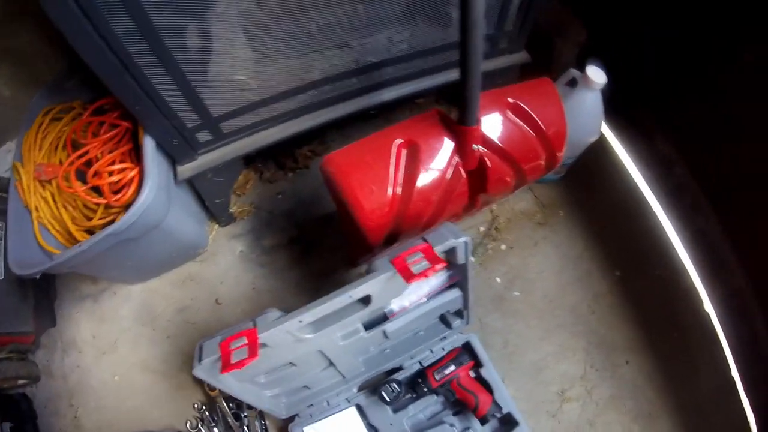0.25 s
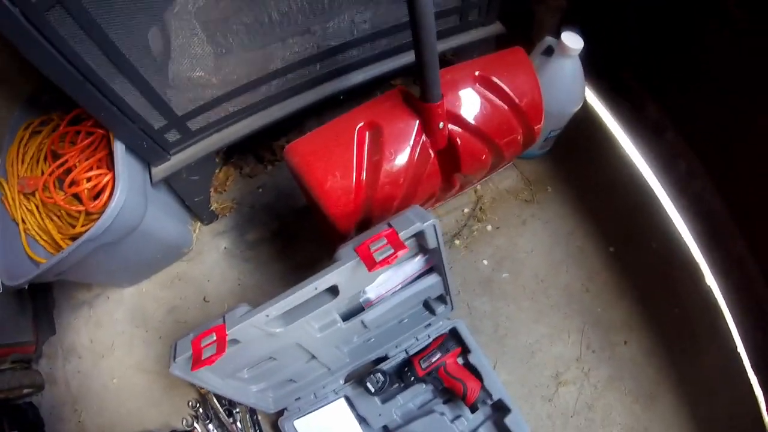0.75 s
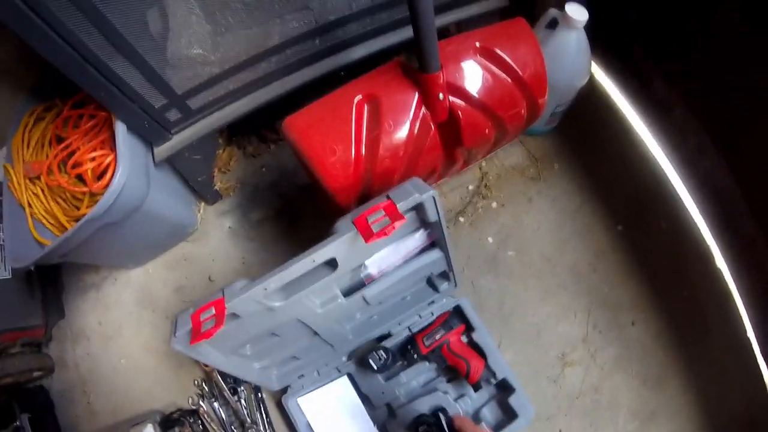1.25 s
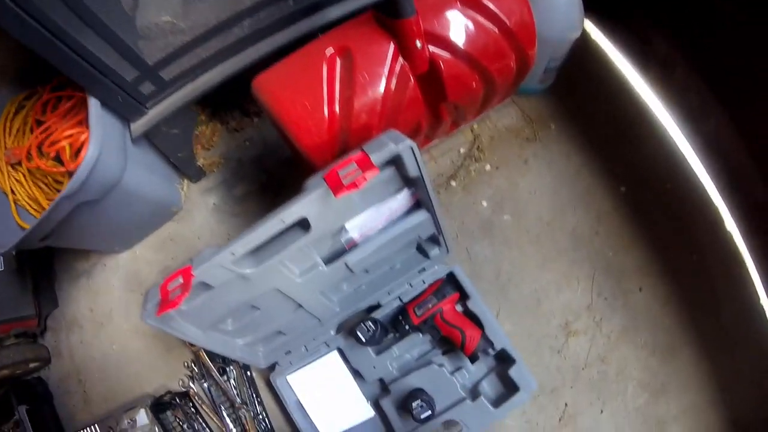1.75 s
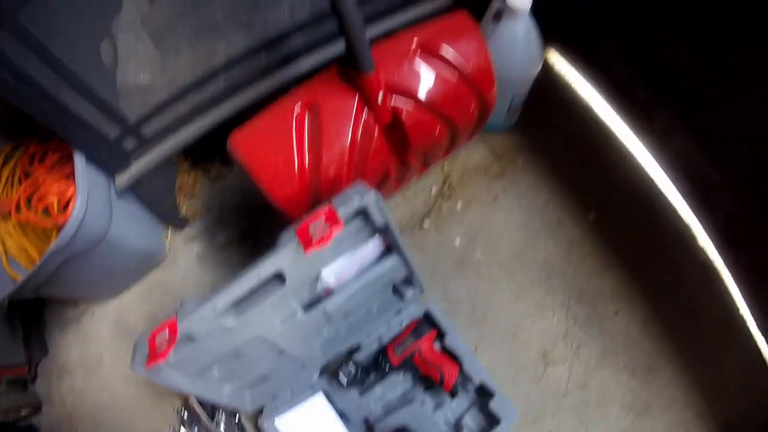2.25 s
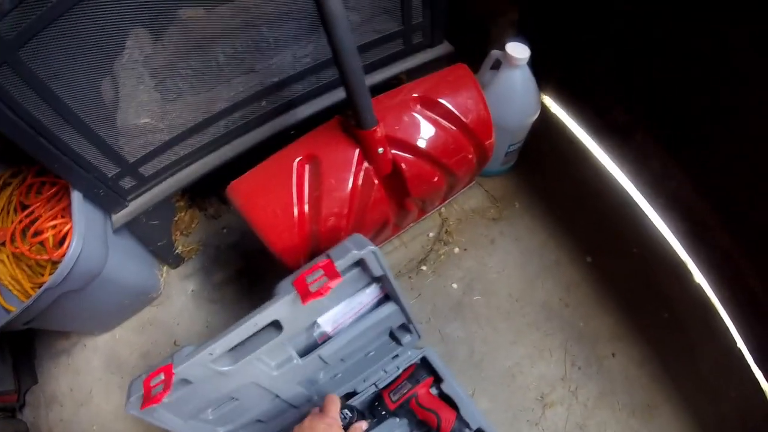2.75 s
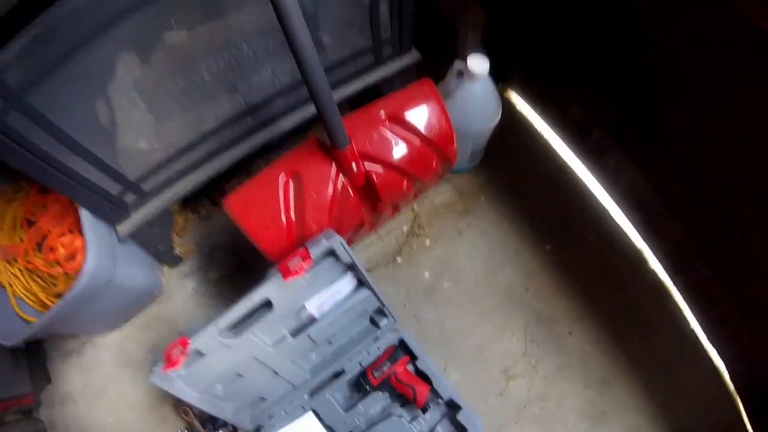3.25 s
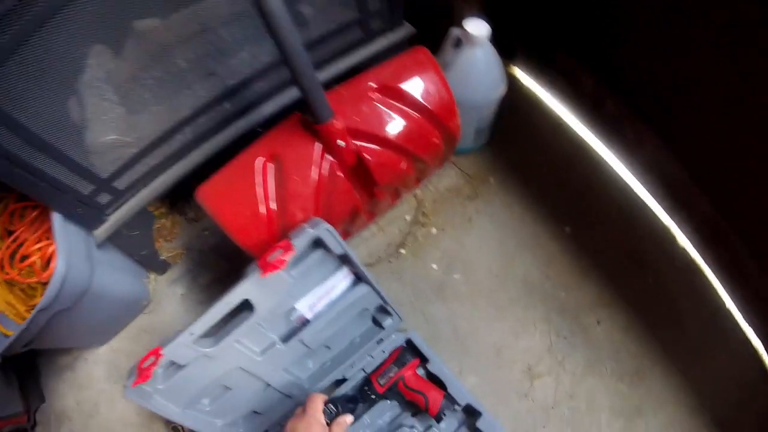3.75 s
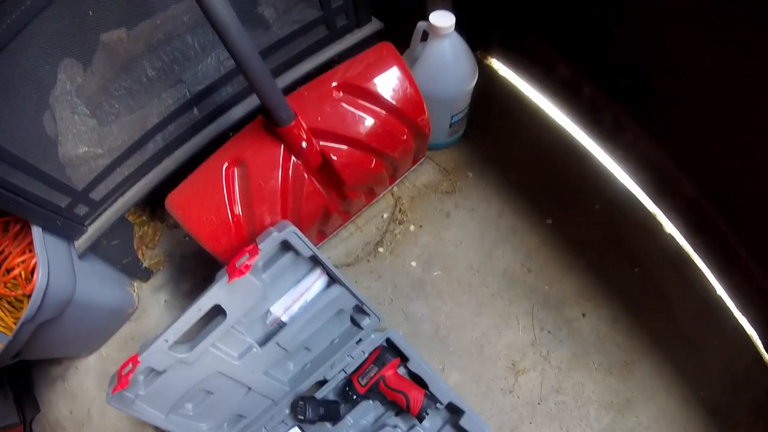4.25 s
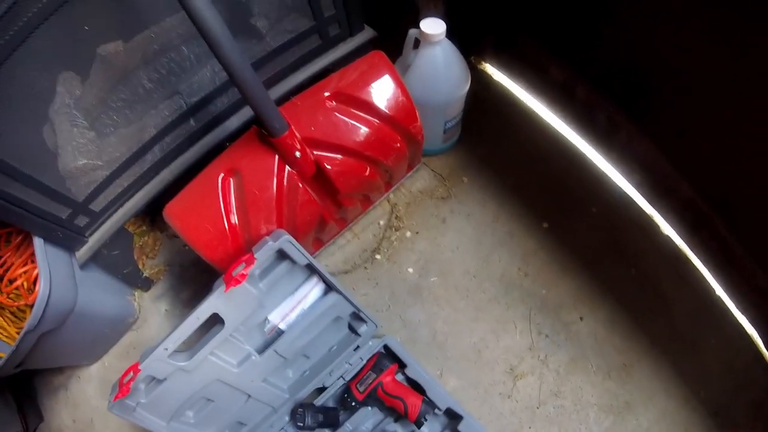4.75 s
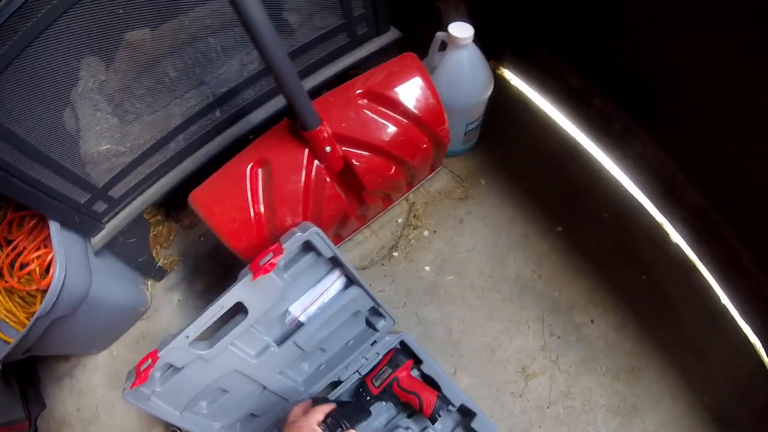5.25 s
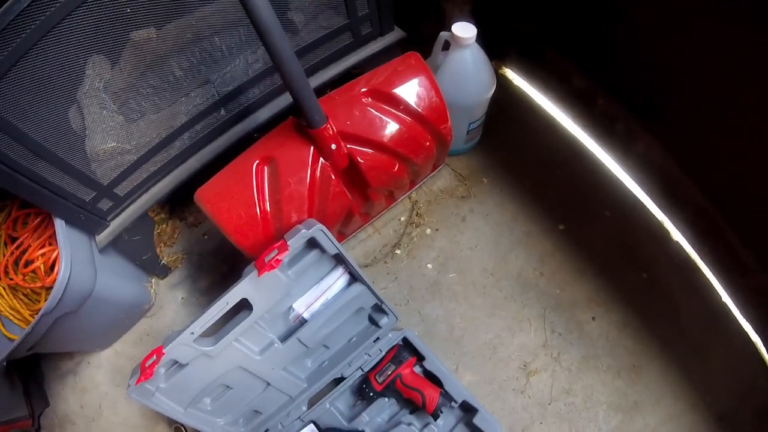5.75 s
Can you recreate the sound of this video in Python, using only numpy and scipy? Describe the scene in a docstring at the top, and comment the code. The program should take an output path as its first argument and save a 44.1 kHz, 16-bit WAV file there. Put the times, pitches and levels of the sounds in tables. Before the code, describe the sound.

Faint steel clinks and a light scrape, then hollow plastic knocks, clacks and rattles as sockets and a power tool are handled in a tool case.

```python
"""A faint ring is already dying away as the sound begins, with a scrape and a light knock, then hollow thuds,
clacks and chatter. Garage floor: steel sockets and a power tool are sorted in a hollow plastic tool case.
Knocks and clinks are damped modes and noise bursts; chatter is random small contacts; slides are slipping
noise. The direct sound outweighs the garage's brief answer; low rumble and hiss lie beneath. A small microphone
with a resonant port feeds the left channel only; the right is silent."""
import sys
import numpy as np
from scipy import signal
from scipy.fft import rfft, irfft, next_fast_len
from scipy.io import wavfile
from scipy.ndimage import map_coordinates

SR = 44100
rng = np.random.default_rng(int(sys.argv[2]) if len(sys.argv) > 2 else 0)


def wav_out(sig):
    """Save sig, one row per channel (or a flat mono array), as 16-bit PCM at SR to the path in sys.argv[1]."""
    wavfile.write(sys.argv[1], SR, np.round(np.clip(np.atleast_2d(sig).T, -1, 1) * 32767).astype(np.int16))


N = 265349  # length [samples]


def amp(db):
    """Decibels to gain."""
    return 10 ** (np.asarray(db) / 20)


def unit(x):
    """x scaled to rms 1."""
    return x / np.sqrt(np.mean(x ** 2) + 1e-20)


def blow(x, db):
    """x scaled so that the rms of its first 20 ms has the given level."""
    return amp(db) * x / np.sqrt(np.mean(x[:SR // 50] ** 2) + 1e-20)


def add(track, s, sound):
    """Mix a sound into the track at time s."""
    part = track[max(0, round(s * SR)):][:len(sound)]
    part += sound[:len(part)]


def along(points, hz):
    """(frequency, value) points read on a log frequency axis."""
    f, v = np.transpose(points)
    return np.interp(np.log(hz + 1), np.log(f + 1), v)


def coloured(x, points):
    """x through a causal, minimum-phase filter with the given spectrum."""
    m = 2 * next_fast_len(len(x))
    log_gain = np.log(amp(along(points, np.fft.rfftfreq(m, 1 / SR))))
    # folding the cepstrum forward in time makes the filter causal
    cepstrum = irfft(log_gain)
    cepstrum[1:m // 2] *= 2
    cepstrum[m // 2 + 1:] = 0
    response = np.exp(rfft(cepstrum))
    return irfft(rfft(x, m) * response, m)[:len(x)]


def ring(modes, t, scatter_db, detune):
    """Damped modes; the place of contact sets the strength and sign of each, and pitches scatter a little."""
    out = np.zeros(len(t))
    draws = rng.standard_normal((len(modes), 3))
    for (hz, db, t60), (size, shift, side) in zip(modes, draws):
        envelope = amp(db + scatter_db * size - 60 * t / t60)
        tone = np.sin(2 * np.pi * hz * (1 + detune * shift) * t)
        out += np.sign(side) * envelope * tone
    return out


def burst(t, t60, colour, rise=0.00023):
    """Countless close, heavily damped modes of a plastic wall that gives a little under the blow."""
    envelope = amp(-60 * t / t60) * (1 - np.exp(-t / rise))
    return coloured(rng.standard_normal(len(t)) * envelope, colour)


FOCUS_DB, FOCUS_OCTAVES = 6.5, 0.16  # greatest lift of a favoured mode, and its reach in pitch


def favoured(modes, place_hz):
    """The modes with a belly at the struck place ring louder."""
    lifted = []
    for hz, db, t60 in modes:
        octaves = np.log2(hz / place_hz)
        lift_db = FOCUS_DB * np.exp(-(octaves / FOCUS_OCTAVES) ** 2)
        lifted.append((hz, db + lift_db, t60))
    return lifted


# A tool meets the case: (time [s], relative strength [dB], hardness: relative click [dB],
# weight: relative shell thump [dB], pitch the struck place favours [Hz])
KNOCKS = [(0.006, -52, -1, -1, 806), (1.028, -61, 14.5, -7, 1030), (1.093, -77.5, 19.5, -10, 1000),
          (2.0542, -20, -6.5, -17, 325), (2.1113, -26.5, -8.5, -14, 321), (2.347, -34, -6, -27, 240),
          (2.3524, -28, -8, -21, 240), (2.404, -33, -15, -28, 315), (2.417, -36, -6.5, -24, 620),
          (2.5675, -38.5, -11.5, -30, 880), (2.7, -44, -21, -29, 370), (2.832, -50.5, -11.5, -12, 760),
          (2.9317, -44.5, -9, -20, 368), (3.013, -49, -16.5, 0, 860), (3.213, -39, -22.5, -7, 636),
          (3.256, -35, -22, 4.5, 181), (3.317, -40.5, -27.5, 1, 180), (3.741, -20.5, -13, 3, 310),
          (3.76, -24, -14.5, -16, 600), (3.8166, -45.5, 8, -16, 350), (3.948, -34, -9, -9.5, 330),
          (3.973, -31.5, -21, -1.5, 232), (4.006, -36, -11.5, -7, 317), (4.036, -39, -16, 4, 315),
          (4.215, -46.5, -24, 1, 470), (4.494, -55.5, -36, 6.5, 358), (4.582, -46.5, -15, -0.5, 350),
          (4.599, -34.5, -18.5, -7, 318), (4.699, -35, -19.5, -15, 365), (5.215, -43.5, -24, -0.5, 265),
          (5.243, -42.5, -5, 1, 180), (5.377, -33.5, -24.5, -1, 317), (5.398, -31.5, -29.5, -6, 633),
          (5.4997, -32.5, -8.5, 5, 143), (5.6775, -48.5, 6.5, 1, 180), (5.712, -30.5, -22, -5.5, 340),
          (5.926, -50.5, 4.5, 12, 343), (5.9435, -19.5, -17, -2, 250), (5.999, -26.5, -35, -19, 325)]
# Whole shell against the floor, the case's panels, its stiff ribs and walls:
# (frequency [Hz], relative level [dB], t60 [s])
SHELL = [(106.5, -8.5, 0.15), (117, -10.5, 0.29), (145.7, -5.5, 0.11), (183.3, -1.5, 0.12)]
PANELS = [(244.7, 1.5, 0.11), (277, -5, 0.13), (317.9, -0.5, 0.15), (367.7, 5, 0.11), (467.4, 2.5, 0.071),
          (633.5, 0.5, 0.1), (681, 0.5, 0.053), (770.5, -6, 0.11), (871, -4, 0.081), (994.5, -8, 0.094)]
RIBS = [(1246.4, 2, 0.055), (1373, -5.5, 0.078), (1642, -4, 0.085), (1760, -2, 0.056), (1978, -4, 0.052),
        (2294, -4, 0.041), (2510, -8, 0.058), (2774, -4.5, 0.054)]
# How well the shell and the small case radiate: (frequency [Hz], gain [dB])
SHELL_RADIATION = [(20, -47), (55, -7), (95, -8.5), (220, -0.5), (600, -21), (4000, -52)]
RADIATION = [(20, -56), (70, -28), (150, -9.5), (220, 2), (900, -3), (2000, -5), (8000, -33)]
# Colour of the hollow clack and of the hard click: (frequency [Hz], relative density [dB per Hz])
CLACK = [(100, -66.5), (350, 2.5), (700, 6.5), (1100, 2), (1450, -1), (1800, -5.5), (2350, -9.5),
         (2800, -17.5), (3500, -14), (7000, -46), (14000, -70)]
CLICK = [(300, -57), (1500, -18.5), (2800, 9), (3800, 2), (4700, 2.5), (6000, -3), (6900, -11.5),
         (7600, -10), (9000, -16), (11000, -31), (14000, -72)]
CLACK_DB, CLACK_PER_HARDNESS = -2.5, 0.43  # clack at zero hardness, and its growth [dB per dB]


def knocks(brightening=0.42, plain_hardness_db=-9, ribs_db=-8):
    """A tool meets the case: shell thump, panel ring, hollow clack with ringing ribs, and hard click."""
    out, t = np.zeros(N), np.arange(SR // 2) / SR
    for s, strength_db, hardness_db, weight_db, place_hz in KNOCKS:
        clack_db = CLACK_DB + CLACK_PER_HARDNESS * hardness_db
        shell_ring = ring(favoured(SHELL, place_hz), t, scatter_db=6.0, detune=0.018)
        shell = coloured(shell_ring, SHELL_RADIATION)
        panel_ring = ring(favoured(PANELS, place_hz), t, scatter_db=2.5, detune=0.0076)
        panels = coloured(panel_ring, RADIATION)
        # a hard, clicking contact also drives the wall's higher modes (dB per octave)
        tilt_db = brightening * (hardness_db - clack_db - plain_hardness_db)
        wall_colour = [(hz, db + tilt_db * np.log2(hz)) for hz, db in CLACK]
        rib_modes = [(hz, db + tilt_db * np.log2(hz), t60) for hz, db, t60 in RIBS]
        wall = burst(t, 0.087, wall_colour)
        ribs = ring(rib_modes, t, scatter_db=3.0, detune=0.0071)
        hollow = blow(wall, 0) + blow(ribs, ribs_db)
        # each part with its own share of the garage
        thump = blow(in_garage(shell, wet_db=-6.5), weight_db - 7.0)
        panel = blow(in_garage(panels, wet_db=-7.5), -0.46)
        clack = blow(in_garage(hollow, wet_db=-7), clack_db + 1.96)
        click = blow(in_garage(burst(t, 0.036, CLICK), wet_db=-13), hardness_db - 4.0)
        add(out, s, amp(strength_db) * (thump + panel + clack + click))
    return out


# A part is dragged over the plastic: (start [s], length before dying away [s], relative rubbing [dB],
# hardness of the edge [0-1], relative bumping [dB])
DRAGS = [(0, 0.01, -49.5, 1, -61), (2.856, 0.16, -70, 0.2, -49), (2.889, 0.034, -61, .5, -42.5),
         (5.188, 0.12, -59, 0.14, -44), (5.38, 0.068, -51, 0, -45), (5.501, 0.058, -46, 0.07, -50.5),
         (5.585, 0.042, -58.5, 0.1, -64), (5.836, 0.11, -49.5, 1, -52)]
DRAG_ATTACK_S, DRAG_T60_S = 0.026, 0.17  # a drag gathers speed, and comes to rest


def stroke(start, length):
    """The speed of one drag: it rises, and dies away once its length is over."""
    t = np.arange(N) / SR - start
    gathering = np.clip(t / DRAG_ATTACK_S, 0, 1)
    return gathering * amp(-60 * np.maximum(t - length, 0) / DRAG_T60_S)


SETTLE_DB, SETTLE_DELAY_S, SETTLE_T60_S = -16.5, 0.015, 0.24  # rocking: relative level, wait, decay
BUMPS_PER_S, BUMP_SCATTER_DB = 110, 3  # mean rate over all places, and spread of strength
BUMP_SHELL_DB, BUMP_CLACK_DB, BUMP_CLICK_DB = -8.5, -12.5, -22  # each over the panels


def chatter(count=4):
    """Dragged parts bump over ribs and dropped ones rock to rest: random contacts at a few places."""
    t = np.arange(SR // 3) / SR
    motion = sum(amp(bump_db) * stroke(start, length) for start, length, _, _, bump_db in DRAGS)
    for s, strength_db, *_ in KNOCKS:
        rocking = amp(strength_db + SETTLE_DB - 60 * t / SETTLE_T60_S)
        add(motion, s + SETTLE_DELAY_S, rocking)
    out = np.zeros(N)
    for _ in range(count):
        hits = rng.random(N) < BUMPS_PER_S / count / SR
        bumps = unit(hits * amp(BUMP_SCATTER_DB * rng.standard_normal(N)))
        panels = coloured(ring(PANELS, t, scatter_db=1.0, detune=0.0073), RADIATION)
        shell = coloured(ring(SHELL, t, scatter_db=6.0, detune=0.0085), SHELL_RADIATION)
        place = blow(panels, 0) + blow(shell, BUMP_SHELL_DB)
        place += blow(burst(t, 0.11, CLACK), BUMP_CLACK_DB)
        place += blow(burst(t, 0.02, CLICK), BUMP_CLICK_DB)
        out += signal.fftconvolve(bumps * motion, place / np.linalg.norm(place))[:N]
    return in_garage(out / np.sqrt(count), wet_db=-10.5)


def wobble(rate):
    """A smooth random curve, rate knots a second."""
    knots = rng.standard_normal(int(N * rate / SR) + 4)
    return map_coordinates(knots, [np.arange(N) * rate / SR])


# Colour of soft and of hard edges on the plastic: (frequency [Hz], relative level [dB])
HOLLOW_RUB = [(100, -30), (400, -1), (700, -6), (1100, -8), (1500, -4.5), (2300, -22), (3200, -16),
              (5000, -34), (14000, -55)]
HARD_RUB = [(100, -26), (400, -2), (1100, -2.5), (1700, 3.5), (2300, -7.5), (3100, -1), (4200, -15),
            (5500, -10), (8000, -28.5), (14000, -47)]


def slides():
    """Sliding parts catch and slip on the grained plastic: soft edges sound hollow, hard ones rasp."""
    slips = amp(1.7 * wobble(170))
    hollow = unit(coloured(rng.standard_normal(N) * slips, HOLLOW_RUB))
    rasp = unit(coloured(rng.standard_normal(N) * slips, HARD_RUB))
    friction = np.zeros(N)
    for start, length, rub_db, hard, _ in DRAGS:
        rub = np.sqrt(1 - hard) * hollow + np.sqrt(hard) * rasp
        friction += amp(rub_db) * stroke(start, length) * rub
    return in_garage(friction, wet_db=-6)


# Steel touching steel: (time [s], relative level [dB], nominal pitch [Hz], t60 before each partial's share [s])
CLINKS = [(.002, -55.5, 1662, 0.21), (.004, -59.5, 3170, 0.15), (0.108, -55, 3240, 0.01),
          (.297, -62, 5000, 0.032), (.352, -69, 5100, .03), (0.388, -68, 5000, 0.067),
          (0.481, -65.5, 5140, 0.056), (1.03, -59, 5600, 0.032), (1.033, -63, 7900, 0.13),
          (1.226, -64, 5150, 0.039), (1.286, -62, 6250, 0.028), (2.751, -70.5, 6400, 0.034),
          (4.902, -64, 3770, 0.033), (5.021, -60, 3330, 0.041), (5.0685, -51, 4980, 0.066),
          (5.191, -57.5, 3300, 0.061), (5.3137, -52.5, 4700, 0.018), (5.632, -59, 5400, 0.023)]
# Partials of a socket: (multiple of its pitch, relative level [dB], share of its t60)
SOCKET = [(1, 11, 0.44), (1.024, -34, 0.49), (.66, 2.5, 0.4), (1.42, 0.5, 0.15), (2.23, -2, 0.34)]


def clinks():
    """Loose sockets touch: a tiny tick and a ring that their neighbours damp."""
    out, t = np.zeros(N), np.arange(SR // 3) / SR
    for s, db, hz, t60 in CLINKS:
        partials = [(hz * k, level, t60 * share) for k, level, share in SOCKET]
        steel = ring(partials, t, scatter_db=1.0, detune=0.0041)
        tick = blow(burst(t, 0.061, CLICK), -8.0)
        add(out, s, amp(db) * in_garage(steel + tick, wet_db=-9))
    return out


# Dying away of the garage: (frequency [Hz], t60 [s])
GARAGE = [(120, 0.4), (400, 0.45), (1200, 0.48), (3000, 0.38), (7000, 0.39), (13000, 0.13)]


def in_garage(x, wet_db, build=0.0038):
    """x plus a fresh diffuse tail that builds up over milliseconds and decays by frequency."""
    hz, t, z = signal.stft(rng.standard_normal(SR // 2), SR, nperseg=256)
    decay = amp(-60 * t / along(GARAGE, hz)[:, None])
    tail = signal.istft(z * decay, SR, nperseg=256)[1]
    tail *= 1 - np.exp(-(np.arange(len(tail)) / SR / build) ** 2)
    return x + amp(wet_db) * signal.fftconvolve(x, tail / np.linalg.norm(tail))[:len(x)]


# Colour of the room's air: (frequency [Hz], relative level [dB])
AIR = [(8, -12), (24, 0.5), (50, -6), (90, -14), (150, -21), (350, -26), (700, -31), (1400, -33.5),
       (2800, -37), (4500, -45.5), (6000, -44), (7500, -40), (9000, -40.5), (10400, -48.5), (12000, -45),
       (14000, -53)]


def background():
    """Low room rumble under a steady hiss: coloured noise."""
    return amp(-54.0) * unit(coloured(rng.standard_normal(N), AIR))


def scene():
    """Everything reaches the left channel; the right is silent."""
    sound = amp(4.5) * (knocks() + chatter() + slides() + clinks() + background())
    return np.array([sound, np.zeros(N)])


def record(dry, port_hz=6580, width_hz=480, port_db=10.0, top_hz=13900):
    """The microphone port resonates in the treble; a steep low-pass limits the band."""
    m = next_fast_len(N + SR // 2)
    f = np.fft.rfftfreq(m, 1 / SR)
    damping = 1j * f * width_hz
    port = 1 + amp(port_db) * damping / (port_hz ** 2 - f ** 2 + damping)
    low_pass = 1 / np.sqrt(1 + (f / top_hz) ** 120)
    return irfft(rfft(dry, m) * port * low_pass, m)[:, :N]


dry = scene()
out = record(dry)
wav_out(out)
```